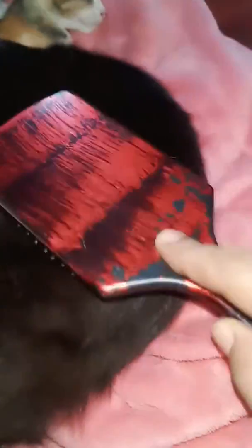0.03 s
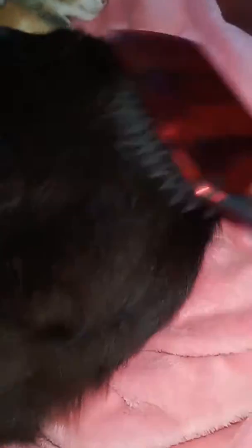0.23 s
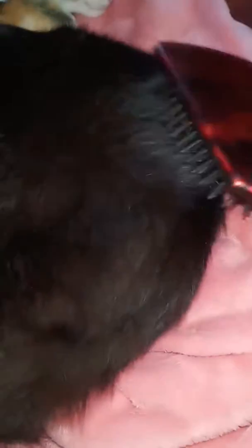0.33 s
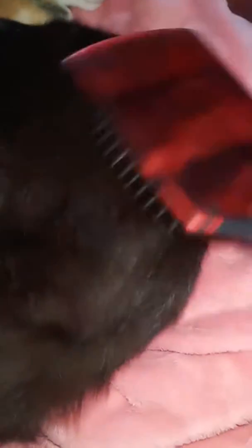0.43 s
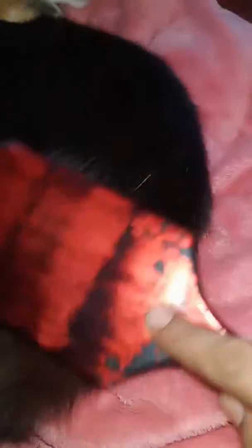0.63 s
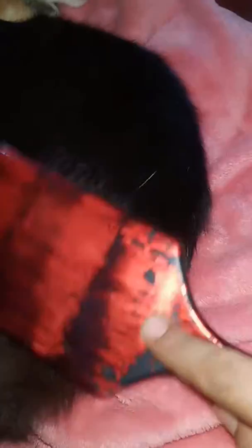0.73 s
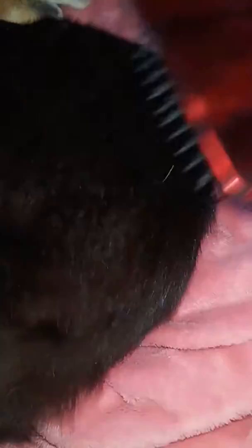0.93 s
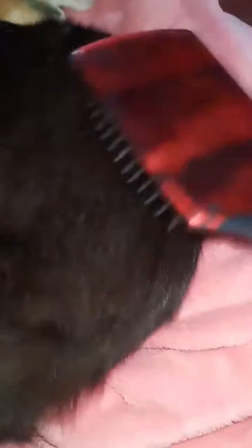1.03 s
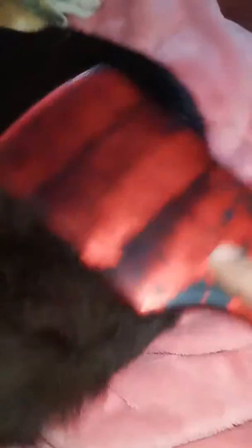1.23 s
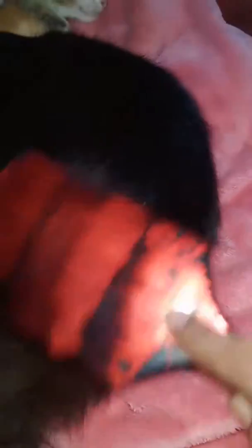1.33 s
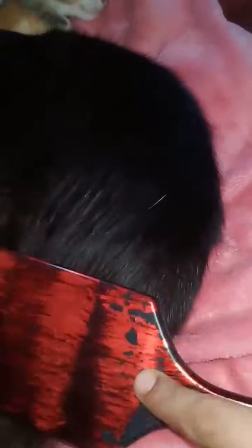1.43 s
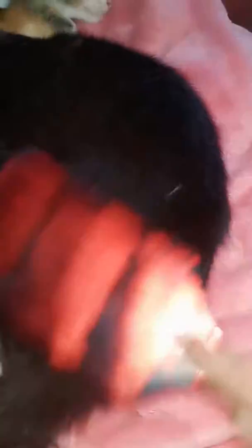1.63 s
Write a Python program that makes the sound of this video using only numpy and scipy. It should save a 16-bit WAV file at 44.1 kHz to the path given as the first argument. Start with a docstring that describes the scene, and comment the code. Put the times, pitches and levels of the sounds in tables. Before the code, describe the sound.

Bristles rustle through fur in soft, hissy swells, at first over low handling bumps. The brush taps lightly, then rubs hollowly as a low hum swells, and two gentler strokes follow. The microphone is close, the room quiet.

```python
"""A paddle brush is drawn through an animal's fur on a blanket, close by in a quiet room.
It opens on soft handling thumps as the bristles slip through the coat and rustle.
Around 0.8 s the brush knocks lightly against the coat and single bristles flick free.
From 1 s a low hum swells; over it the cushion rubs and sets the hollow paddle murmuring.
A few more flicks and two lighter drags end the scene."""
import sys
import numpy as np
from scipy import signal
from scipy.fft import rfft, irfft
from scipy.io import wavfile
from scipy.ndimage import uniform_filter1d

SR = 44100
rng = np.random.default_rng(int(sys.argv[2]) if len(sys.argv) > 2 else 0)


def generate_wav(sig):
    """Save sig (samples, or channels by samples) to the path in sys.argv[1] as 16-bit PCM at SR."""
    pcm = np.round(np.clip(np.atleast_2d(sig).T, -1, 1) * 32767).astype(np.int16)
    wavfile.write(sys.argv[1], SR, pcm)


N = 74970
TIME, FREQS = np.arange(N) / SR, np.arange(N // 2 + 1) * SR / N


def from_db(db):
    """Decibels to gain."""
    return 10 ** (np.asarray(db) / 20)


def unit_power(x):
    """Scale to an RMS of one."""
    return x / np.sqrt(np.mean(x ** 2) + 1e-20)


def curve(points):
    """Join (hz, value) points along a log frequency axis."""
    hz, value = np.transpose(points)
    return np.interp(np.log(FREQS + 1), np.log(hz), value)


def colour(x, eq, tilt_db_per_octave=0):
    """Shape a signal with an EQ curve that rolls off past both ends; unit power."""
    low_hz, high_hz = eq[0][0], eq[-1][0]
    gain = from_db(curve(eq) + tilt_db_per_octave * np.log2(np.clip(FREQS, low_hz, high_hz)))
    skirts = 1 / (1 + (FREQS / (2 * high_hz)) ** 4) / (1 + (0.5 * low_hz / (FREQS + 1)) ** 4)
    return unit_power(irfft(rfft(x) * gain * skirts, N))


# Stereo image of the noise: frequency_hz, left_right_correlation
STEREO_IMAGE = [(60, 0.98), (150, 0.98), (350, 0.65), (700, 0.36), (1500, 0.067), (4000, 0)]
def noise():
    """Stereo white noise, centred in the bass and wide in the treble."""
    mid, side = rfft(rng.standard_normal((2, N)))
    alike = curve(STEREO_IMAGE)
    return irfft(np.sqrt(1 + alike) * mid + np.sqrt(1 - alike) * side * [[1], [-1]], N)


def drift(rate_hz):
    """Slow random motion with a spread of one."""
    return unit_power(irfft(rfft(rng.standard_normal(N)) / (1 + (FREQS / rate_hz) ** 2), N))


def grains(per_s=4600, spread_db=-4):
    """Tiny slips of uneven size, each reaching the two sides with its own strength."""
    onsets = rng.random(N) < per_s / SR
    sizes = from_db(spread_db * np.minimum(rng.exponential(1, N), 4))
    return unit_power(onsets * sizes * rng.standard_normal((2, N)))


def pan(db):
    """Left and right gains; positive leans left."""
    return from_db([[db / 2], [-db / 2]])


def swell(peak_s, rise_s, fall_s, db):
    """A rounded rise and fall about a peak."""
    width_s = np.where(TIME < peak_s, rise_s, fall_s)
    return from_db(db) * np.exp(-((TIME - peak_s) / width_s) ** 2)


def burst(start_s, decay_s, db, attack_s=0.00045):
    """A contact builds up quickly and dies away."""
    age = np.maximum(TIME - start_s, 0)
    return from_db(db) * (1 - np.exp(-age / attack_s)) * np.exp(-age / decay_s)


def resonate(x, hz, width_hz):
    """A steep-sided resonance whose centre may move; unit power."""
    carrier = np.exp(2j * np.pi * np.cumsum(hz * np.ones(N)) / SR)
    pole = np.exp(-1.5 * np.pi * width_hz / SR)
    baseband = signal.lfilter([1], [1, -2 * pole, pole * pole], x / carrier)
    return unit_power((baseband * carrier).real)


def reflections(x, count=14, longest_s=0.009, echo_db=-6):
    """Quick echoes from nearby surfaces, different on each side, ripple the treble."""
    delays_s = rng.uniform(0.1046, 1, (2, count, 1)) * longest_s
    signs = rng.choice([-1, 1], (2, count, 1))
    echoes = (signs * np.exp(-2j * np.pi * FREQS * delays_s)).sum(1) / np.sqrt(count)
    gain = from_db(echo_db)
    return irfft(rfft(x) * (1 + gain * echoes) / np.sqrt(1 + gain ** 2), N)


# Tone of the still room: frequency_hz, gain_db
ROOM_EQ = [(100, 16.5), (250, -59), (500, -7), (1000, -2.5), (2000, -5), (4300, 4.5), (5200, -54),
           (8000, -61.5), (10500, -48), (15000, 13)]
def room_tone(level_db=-75.5):
    """A faint, steady bed of noise."""
    return from_db(level_db) * colour(noise(), ROOM_EQ)


# Fader moves of the hum: time_s, level_db
HUM_FADER = [(0.9, -86.5), (0.97, -58.5), (1.01, -44.5), (1.12, -45.5), (1.31, -52.5), (1.355, -76.5),
             (1.435, -47), (1.5, -59), (1.63, -71), (1.7, -61)]
def low_hum(pitch_hz=77.7, waver=0.02):
    """A low, wavering tone that swells and dips."""
    level_db = np.interp(TIME, *np.transpose(HUM_FADER))
    phase = 2 * np.pi * np.cumsum(pitch_hz * (1 + waver * drift(9.3))) / SR
    return np.sqrt(2) * from_db(level_db) * np.sin(phase)


# Soft handling thumps: peak_s, rise_s, fall_s, level_db, pitch_hz
THUMP_CUES = [(0.033, 0.0037, 0.0095, -43.5, 117), (0.082, 0.0096, 0.014, -43.5, 121),
              (0.149, 0.027, 0.11, -44.5, 76.86), (0.197, 0.0057, 0.016, -35, 82.5),
              (0.234, 0.0079, 0.048, -34.5, 77.8), (0.271, 0.0054, 0.014, -35.5, 75.4),
              (0.336, 0.017, 0.018, -42.5, 82.2), (0.483, 0.0073, 0.025, -54, 64),
              (0.786, 0.017, 0.023, -61, 89.5), (0.99, 0.072, 0.16, -56.5, 117),
              (1.499, 0.017, 0.011, -49, 72)]
def handling_thumps():
    """Each bump of handling is a rounded pulse of one bass tone."""
    return np.sqrt(2) * sum(swell(peak, rise, fall, db) * np.cos(2 * np.pi * hz * (TIME - peak))
                            for peak, rise, fall, db, hz in THUMP_CUES)


def burr(bass, level_db=-71):
    """A soft band of low noise that grows with the bass under it."""
    motion = unit_power(np.sqrt(np.abs(uniform_filter1d(np.abs(bass), size=5000))))
    return from_db(level_db) * motion * resonate(noise(), hz=175, width_hz=70)


# Weight of the moving hand: frequency_hz, gain_db
RUMBLE_EQ = [(33, -33), (44, -13), (62, -4.5), (80, -6.5), (115, -6.5), (170, -23.5), (260, -26),
             (450, -30.5)]
def hand_rumble(level_db=-61.5, wobble_db=2):
    """The moving hand makes an uneven rumble."""
    return colour(noise(), RUMBLE_EQ) * from_db(level_db + wobble_db * drift(25))


# Tone of a knock: frequency_hz, gain_db
KNOCK_EQ = [(280, -12), (650, -10), (1150, -12), (1580, 11), (2000, -13), (3300, 2.5), (4400, -7),
            (5200, -28)]
# Light knocks: start_s, level_db, pan_db, brightness_db_per_octave, spot_pitch_hz
KNOCK_CUES = [(0.727, -64, -1, -7, 290), (0.7584, -59, 2.5, -1.5, 282), (0.777, -68.5, 7.5, 1, 1580),
              (0.797, -69, 3, 6, 3400), (0.823, -74.5, -11, 10.5, 1630), (0.914, -68, -3.5, -8.5, 250),
              (1.099, -62.5, 8.5, -9, 2160), (1.1159, -61.5, 2.5, -6.5, 700), (1.37, -73, 12, -15.5, 388)]
def brush_knocks(decay_s=0.01, ring_hz=1560, ring_s=0.0087, ring_db=-7, spot_db=-2):
    """Brief contacts of the brush, each with the pitch of the spot struck and a ring of its back."""
    contact = noise()
    out = 0
    for start, db, pan_db, tilt, hz in KNOCK_CUES:
        spot = from_db(spot_db) * resonate(contact, hz, width_hz=0.42 * hz)
        tick = (colour(contact, KNOCK_EQ, tilt) + spot) * burst(start, decay_s, db)
        ring = np.sin(2 * np.pi * ring_hz * (TIME - start)) * burst(start, ring_s, db + ring_db + tilt)
        out += (tick + ring) * pan(pan_db)
    return out


def body_ring(friction, modes):
    """Friction excites a set of fixed resonances; unit power."""
    return unit_power(sum(from_db(db) * resonate(friction, hz, width) for hz, width, db in modes))


# Low and high resonances of the paddle: pitch_hz, width_hz, gain_db
LOW_MODES = [(577.6, 31, 9), (617, 22.5, 5.5), (676, 17.4, 5)]
HIGH_MODES = [(1487, 210, -1.5), (2000, 320, 1.5), (3120, 760, -3)]
# Cushion rubbing over the coat: peak_s, rise_s, fall_s, level_db, pan_db,
# hollow_pitch_hz, hollow_width_hz, low_modes_db, high_modes_db
RUB_CUES = [(0.082, 0.03, 0.05, -66, -8, 797, 148, -17, -28),
            (0.439, 0.09, 0.073, -69, -4, 889, 94, -9.5, -11),
            (1.219, 0.049, 0.074, -64.5, 3, 938, 80, -3, -2),
            (1.264, 0.0024, 0.039, -49.5, -0.5, 886, 139, 0, -12.5),
            (1.312, 0.12, 0.041, -65.5, 8, 1085, 45.6, 0.5, -20),
            (1.411, 0.023, 0.031, -66.5, 10.5, 975, 41.5, 0, -19)]
def paddle_rubs(glide_per_s=0.31, centre_mix=0.72):
    """Rubbing rings the paddle's body and a hollow resonance that rises as the cushion is pressed."""
    out = 0
    for peak, rise, fall, db, pan_db, hz, width, low_db, high_db in RUB_CUES:
        friction = noise() + centre_mix * rng.standard_normal(N)
        low = from_db(low_db) * body_ring(friction, LOW_MODES)
        high = from_db(high_db) * body_ring(friction, HIGH_MODES)
        hollow = resonate(friction, hz * np.exp(glide_per_s * (TIME - peak)), width)
        out += unit_power(hollow + low + high) * swell(peak, rise, fall, db) * pan(pan_db)
    return out


# Airy tone of the hair: frequency_hz, gain_db
SWISH_EQ = [(4500, -18.5), (6500, 5), (9000, 5), (10800, -6), (13000, -3.5), (15200, 4.5)]
# Swishes: peak_s, rise_s, fall_s, level_db, pan_db
SWISH_CUES = [(0.125, 0.035, 0.063, -63, -0.5), (0.822, 0.038, 0.044, -69, 29.5),
              (1.401, 0.0093, 0.021, -74, 23)]
def hair_swishes(friction):
    """Sliding hair gives short breaths of bright hiss."""
    envelope = sum(swell(*shape) * pan(pan_db) for *shape, pan_db in SWISH_CUES)
    return colour(friction, SWISH_EQ) * envelope


# Singing scrapes: peak_s, rise_s, fall_s, level_db, pan_db, pitch_hz, width_hz
SCRAPE_CUES = [(0.1395, 0.0031, 0.029, -59.5, 8, 3334, 260), (1.403, .008, 0.014, -69, 12.5, 3540, 110),
               (1.408, 0.016, 0.03, -75, 8.5, 4300, 300), (0.765, 0.11, 0.064, -75, 1, 4300, 160),
               (0.11, 0.34, 0.1, -77, -1.5, 1740, 160)]
def pin_scrapes(friction):
    """Friction makes the pins sing in narrow bands."""
    return sum(resonate(friction, hz, width) * swell(*shape) * pan(pan_db)
               for *shape, pan_db, hz, width in SCRAPE_CUES)


# Drags of the bristles through the fur: peak_s, rise_s, fall_s, level_db
DRAG_CUES = [(0.014, 0.058, 0.023, -65.5), (0.126, 0.072, 0.068, -61.5), (0.334, 0.083, 0.15, -64),
             (0.70, 0.16, 0.25, -66.5), (0.804, 0.086, 0.049, -61), (1.11, 0.1, 0.15, -69),
             (1.274, 0.046, 0.056, -60), (1.518, 0.068, 0.086, -65.5), (1.69, 0.061, 0.086, -66)]
def drag_level(floor_db=-73.5):
    """The level of the brushing in dB: strokes add in power to a light, constant drag."""
    return 10 * np.log10(from_db(floor_db) ** 2 + sum(swell(*cue) ** 2 for cue in DRAG_CUES))


# Duller tone of the coat: frequency_hz, gain_db
COAT_EQ = [(250, 8), (600, -30), (1150, 1), (1600, 0.5), (2400, -0.5), (3400, -0.5), (3900, -4),
           (4300, 1.5), (5000, -11.5), (11000, -11.5), (15000, -6.5)]
def coat_rustle(drag_db, level_db=-73.5, follow=0.59):
    """The coat gives a grainy rustle that rises and falls with the drag."""
    rustle = colour(noise() + grains(per_s=1500, spread_db=1.5), COAT_EQ)
    return rustle * from_db(level_db + follow * (drag_db - drag_db.mean())) * pan(2)


def crackle(drag_db, decay_s, per_s=120, level_db=-75.5, follow=0.55):
    """The envelope of sparse, tiny snaps that get louder with the drag."""
    impulses = (rng.random(N) < per_s / SR) * rng.random(N)
    snaps = signal.lfilter([1], [1, -np.exp(-1 / (decay_s * SR))], impulses)
    return unit_power(snaps) * from_db(level_db + follow * (drag_db - drag_db.mean()))


# Bright ring of the bristles, left and right: frequency_hz, gain_db
BRISTLE_LEFT_EQ = [(5000, -30.5), (6100, -22), (6800, -5.5), (7250, -3.5), (7900, -8), (8700, -15),
                   (9700, -30.5), (12000, -26)]
BRISTLE_RIGHT_EQ = [(5000, -20.5), (6500, -14), (7400, -9.5), (8050, 8.5), (8600, 1), (9300, -16.5),
                    (10200, -16), (13000, -41)]
# Single bristles springing free: start_s, level_db, pan_db
FLICK_CUES = [(0.213, -57.5, 7), (0.3084, -60, -8), (0.7590, -54, -11.5), (0.809, -57.5, -9),
              (0.8604, -58, -15), (1.3618, -58.5, -1), (1.399, -54.5, -4), (1.5600, -59, 11)]
def bristles(drag_db, trim_db=-1.5, hiss_mix=0.98, flutter_db=2.15, pan_db=3, flick_decay_s=0.0027):
    """Dense slips, a sparse crackle and a few stronger flicks ring the bristles."""
    texture = unit_power(grains() + hiss_mix * noise())
    slips = texture * from_db(drag_db + trim_db + flutter_db * drift(38)) * pan(pan_db)
    snaps = crackle(drag_db, decay_s=flick_decay_s / 2) * pan(pan_db)
    flicks = sum(burst(start, flick_decay_s, db) * pan(side_db) for start, db, side_db in FLICK_CUES)
    left, right = slips + noise() * (snaps + flicks)
    return np.array([colour(left, BRISTLE_LEFT_EQ) * left.std(),
                     colour(right, BRISTLE_RIGHT_EQ) * right.std()])


def scene():
    """Brushed fur and its reflections, the paddle and the low end, mixed over the room tone."""
    drag_db = drag_level()
    fur = bristles(drag_db) + coat_rustle(drag_db)
    friction = noise() + 0.5 * grains()
    brushing = reflections(fur + hair_swishes(friction) + pin_scrapes(friction))
    paddle = paddle_rubs() + brush_knocks()
    bass = handling_thumps() + low_hum()
    low_end = (bass + burr(bass) + hand_rumble()) * pan(0.96)
    return room_tone() + low_end + paddle + brushing


def record(dry, cutoff_hz=15600):
    """A steep low-pass takes off the very top."""
    return irfft(rfft(dry) / np.sqrt(1 + (FREQS / cutoff_hz) ** 200), N)


dry = scene()
out = record(dry)
generate_wav(out)
```